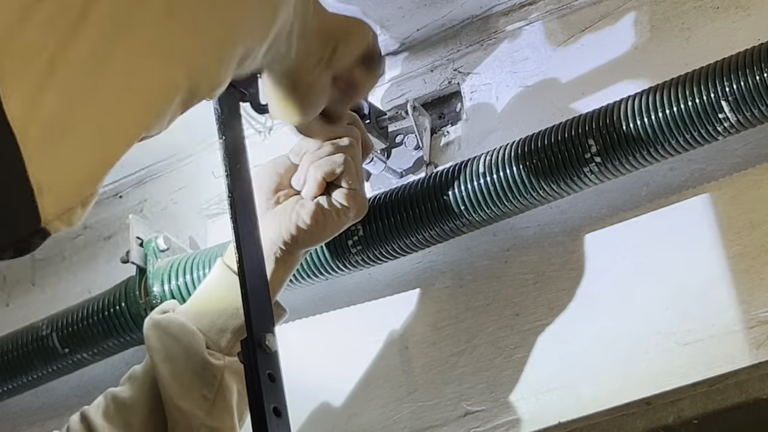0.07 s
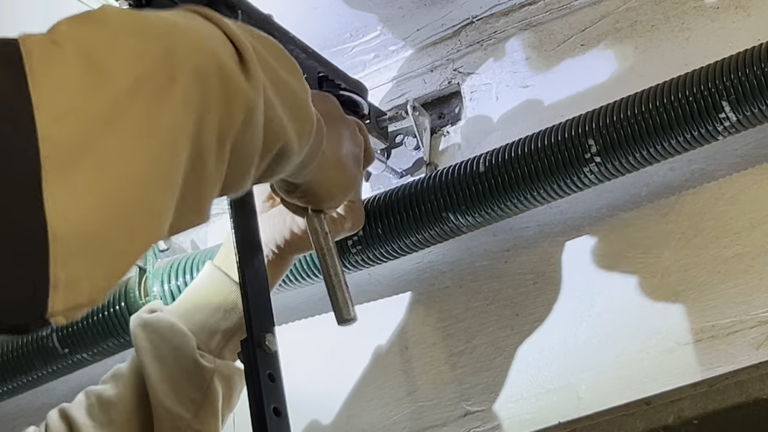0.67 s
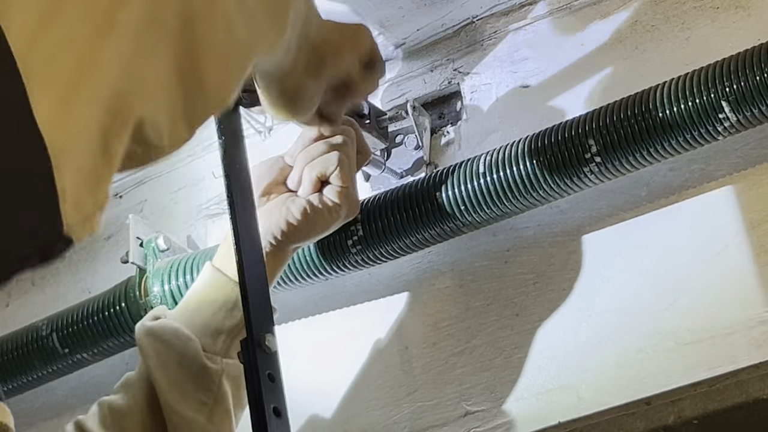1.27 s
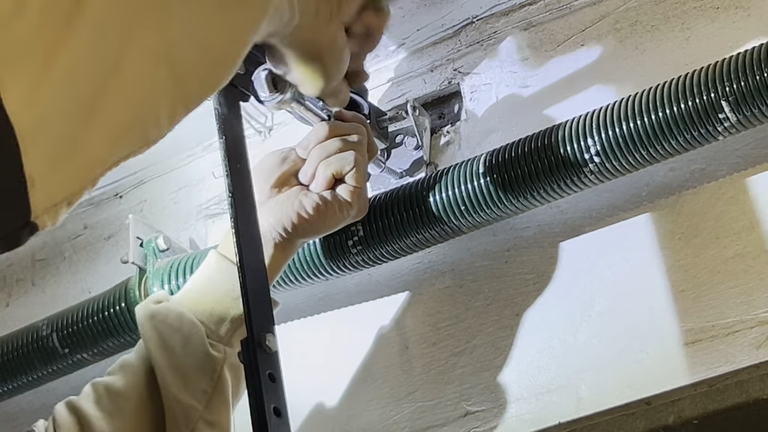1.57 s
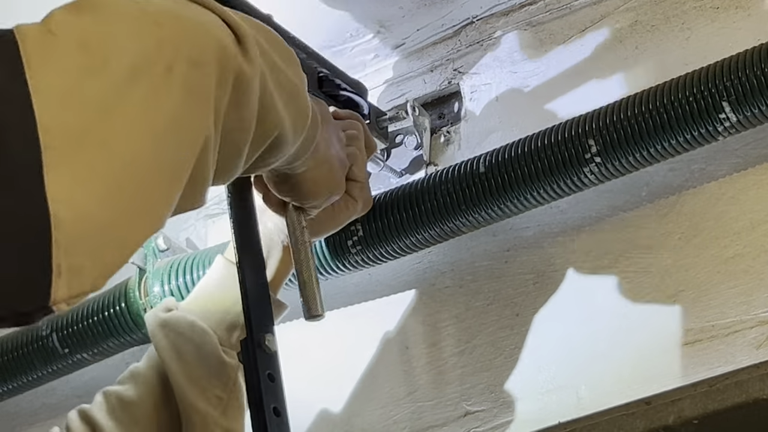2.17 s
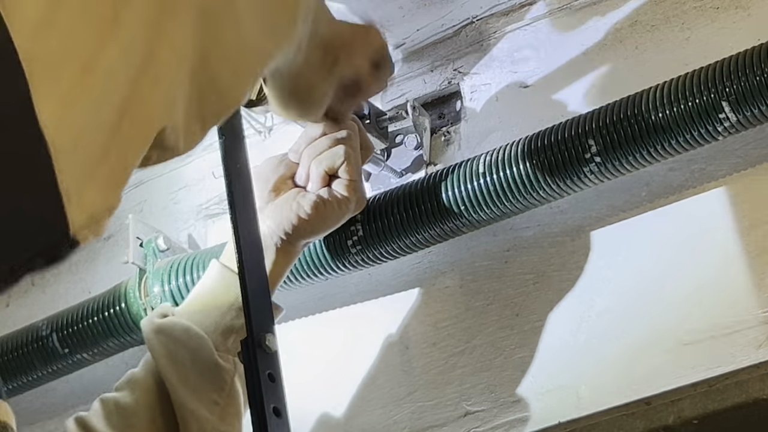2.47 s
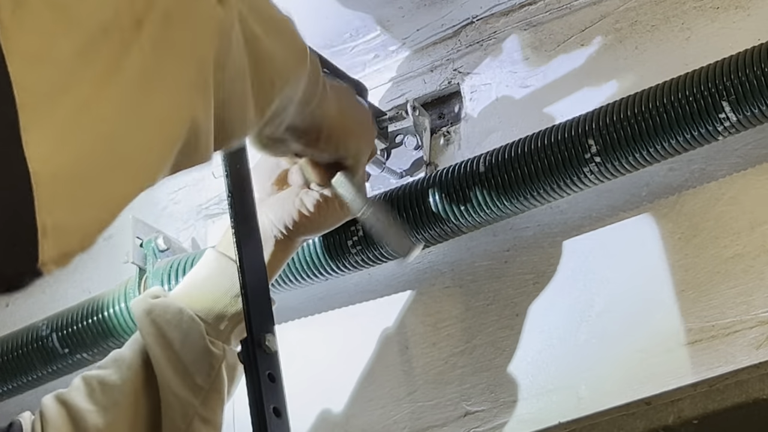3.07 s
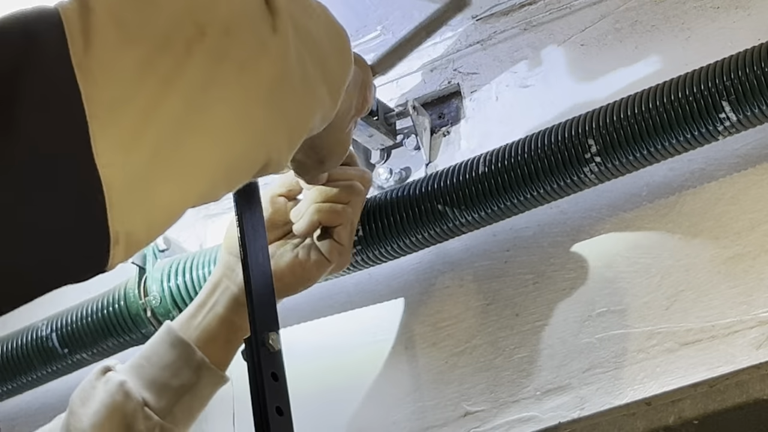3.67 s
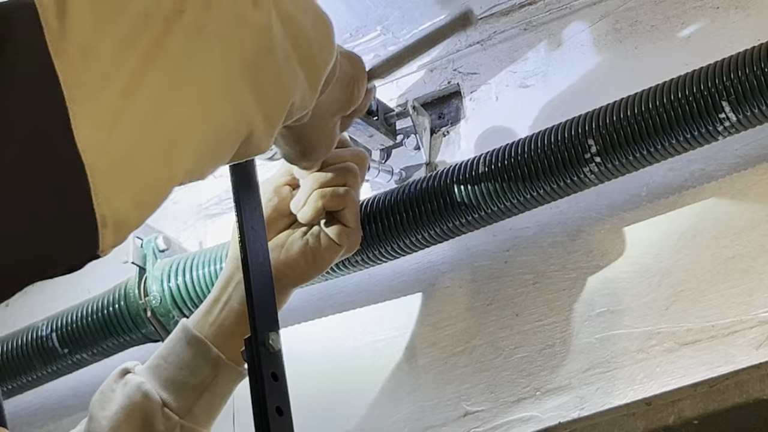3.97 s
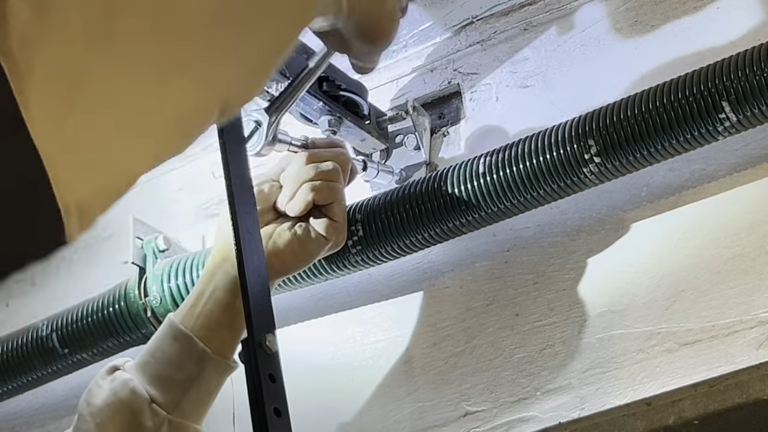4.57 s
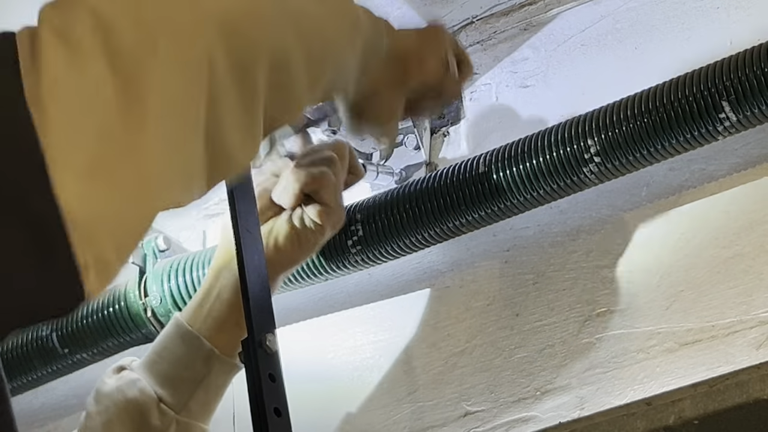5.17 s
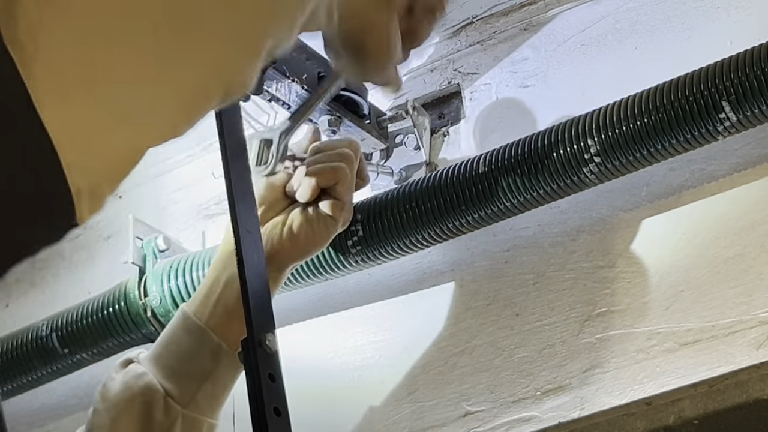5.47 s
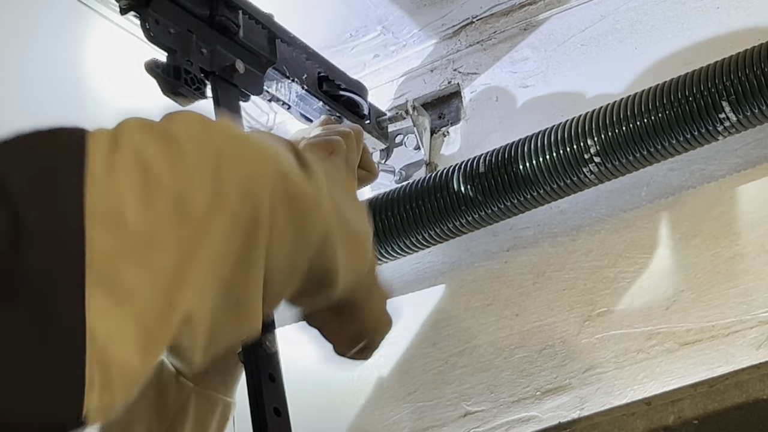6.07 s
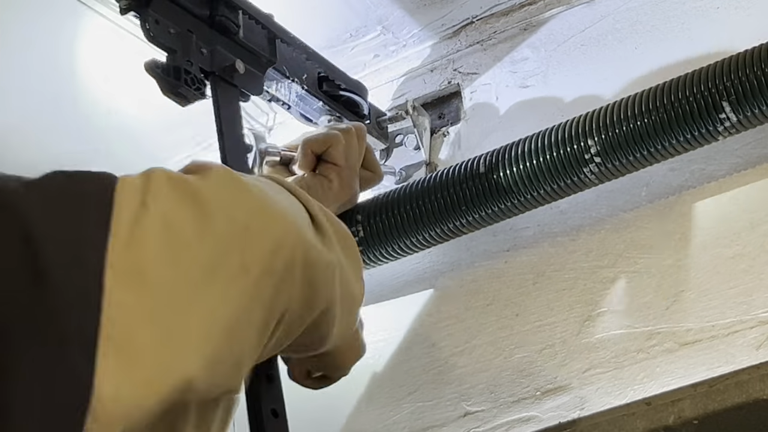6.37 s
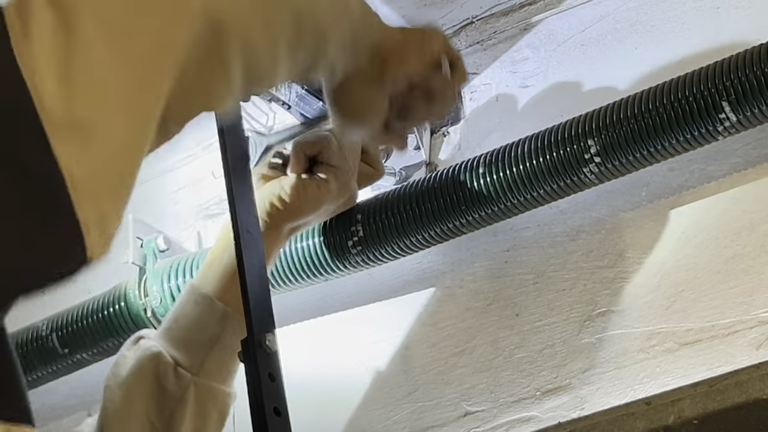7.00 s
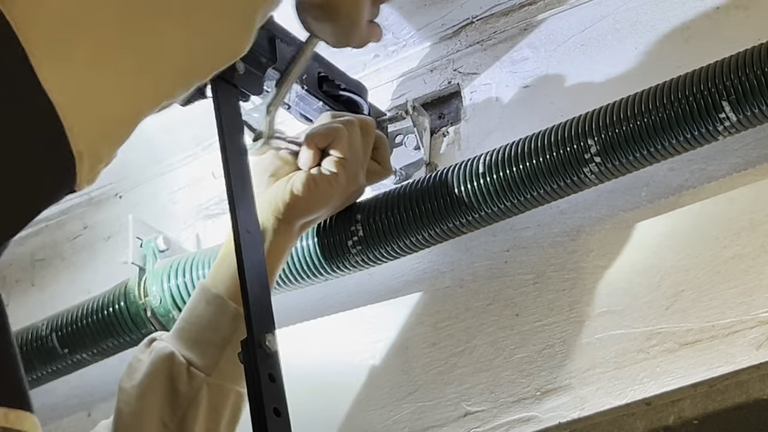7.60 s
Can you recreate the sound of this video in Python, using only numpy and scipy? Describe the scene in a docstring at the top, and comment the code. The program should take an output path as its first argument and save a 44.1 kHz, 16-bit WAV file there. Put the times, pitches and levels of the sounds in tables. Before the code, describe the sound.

A ratchet wrench works a steel bracket overhead in a bare garage. For three seconds, quick zips of ticks alternate with ringing clanks, about two and a half strokes a second. Small bright taps follow as the wrench is reseated. Then the loose socket clunks and the strokes resume with more rubbing, scraping and a stronger low drone from a shaken panel. It is heard in narrow stereo from below.

```python
"""A ratchet wrench on an overhead steel bracket in a bare garage, heard by a closely spaced microphone pair.
For three seconds it makes about 2.5 strokes a second: the pawl ticks over the teeth on each back swing,
and each pull closes the slack with a clank that rings the steelwork and the room. Small taps follow as
the wrench is reseated; the level dips briefly at 3.4 s. From 4 s the loose socket clunks on the bolt,
then the strokes resume with more rubbing and a stronger drone from the panel behind the bracket."""
import sys
import numpy as np
from scipy import signal
from scipy.fft import rfft, irfft, next_fast_len
from scipy.io import wavfile
from scipy.ndimage import uniform_filter1d

SR = 44100
rng = np.random.default_rng(int(sys.argv[2]) if len(sys.argv) > 2 else 0)


def wav_out(sig):
    """Save sig, one row per channel (or a flat mono array), as 16-bit PCM at SR to the path in sys.argv[1]."""
    wavfile.write(sys.argv[1], SR, np.round(np.clip(np.atleast_2d(sig).T, -1, 1) * 32767).astype(np.int16))


N = 345744
TAIL = 32768  # samples for one sound to die away
TIME, AGE = np.arange(N) / SR, np.arange(TAIL) / SR
SIDES = np.array([[1], [-1]])  # left and right channel


def undb(db):
    """Decibels to gain."""
    return 10 ** (np.asarray(db) / 20)


def unit(x):
    """Scale to rms 1."""
    return x / np.sqrt(np.mean(x ** 2))


def along(points, hz):
    """Read (Hz, value) points on a log-frequency axis."""
    freqs, values = np.transpose(points)
    return np.interp(np.log(np.maximum(hz, 1)), np.log(freqs), values)


def bins(x):
    """Frequencies of the spectrum of x."""
    return np.fft.rfftfreq(x.shape[-1], 1 / SR)


def colour(x, points, size=2048):
    """Causal filter with the gain of (Hz, dB) points, built from the cepstrum."""
    cepstrum = irfft(np.log(undb(along(points, np.fft.rfftfreq(size, 1 / SR)))))
    fold = np.r_[1, np.full(size // 2 - 1, 2), 1, np.zeros(size // 2 - 1)]
    response = irfft(np.exp(rfft(cepstrum * fold)))
    return signal.oaconvolve(x, response if x.ndim == 1 else response[None], axes=-1)[..., :x.shape[-1]]


def resonate(x, hz, width):
    """Two-pole band-pass, gain 1 at the centre."""
    return signal.lfilter(*signal.iirpeak(hz, hz / width, fs=SR), x)


def walk(rate):
    """Smooth random wandering with a spread near 1."""
    hold = int(SR / rate)
    return 1.3 * uniform_filter1d(np.repeat(rng.standard_normal(N // hold + 1), hold), hold)[:N]


def ripple(spread_db, step_hz):
    """The crowded peaks and valleys of a steel part's response, as (Hz, dB) points."""
    hz = np.linspace(100, 17000, 400)
    heights = np.interp(hz / step_hz, np.arange(400), rng.standard_normal(400))
    return np.c_[hz, spread_db * (heights - .06 * spread_db)]


def add(track, start, sound):
    """Mix a sound in at a start time in seconds."""
    i = int(start * SR)
    track[..., i:i + sound.shape[-1]] += sound[..., :max(N - i, 0)]


# Stereo width of the diffuse sound: (frequency [Hz], side minus mid [dB])
STEREO_WIDTH = [(60, -23.5), (130, -26), (250, -16.5), (500, -12.5), (1000, -8), (2200, -3), (3200, 0.5),
                (4500, -21.5), (8000, -38), (16000, -8)]

def diffuse(size):
    """Stereo noise: widest near 3 kHz, nearly mono in the bass and from 4.5 to 8 kHz."""
    mid, side = rng.standard_normal((2, size))
    return mid + colour(side, STEREO_WIDTH) * SIDES


# Decay of the bare garage, before stretching: (frequency [Hz], t60 [s])
GARAGE_DECAY = [(150, 1), (700, 0.69), (2000, 0.4), (5500, 0.3), (10000, 0.24), (15000, 0.23)]

def reverberation(stretch):
    """Wall reflections: diffuse noise whose half-octave bands die away at the room's pace."""
    spectrum = rfft(diffuse(TAIL))
    octaves = np.log2(np.clip(bins(AGE), 125, 16000) / 125)
    tail = 0
    for centre in np.arange(15) / 2:
        band = irfft(spectrum * np.maximum(1 - 2 * np.abs(octaves - centre), 0))
        t60 = stretch * along(GARAGE_DECAY, 125 * 2 ** centre)
        tail = tail + band * np.exp(-np.log(1000) * AGE / t60)
    return tail


# Room tone all around the microphones: (frequency [Hz], relative level [dB])
ROOM_TONE = [(20, -34), (40, 0.5), (60, -1.5), (110, -3.5), (200, -17.5), (320, -14), (450, -2.5),
             (1000, -28.5), (3000, -8), (8000, -44.5), (16000, -46)]

def garage_air(level_db=-57):
    """The still air of the garage: a steady low rumble with a faint hiss."""
    return undb(level_db) * unit(colour(diffuse(N), ROOM_TONE))


# Pulls that load the bracket overhead and drag the sleeve:
# (start [s], length [s], relative panel hum [dB], relative scrape [dB])
HANDLE_PULLS = [(0.22, .2, -53.5, -70), (0.92, 0.11, -49.5, -61), (1.284, 0.097, -43.5, -48),
                (1.677, 0.087, -44, -65), (2.083, 0.19, -47.5, -71), (2.465, 0.094, -49, -62),
                (2.931, .13, -41.5, -70), (3.2, 0.12, -45, -69), (4.058, .04, -39, -60),
                (4.28, 0.081, -38.5, -60), (4.67, 0.026, -32, -57), (4.78, 0.13, -47.5, -52),
                (5.169, 0.086, -31.5, -34.5), (5.364, 0.075, -44, -58), (5.57, 0.041, -43, -62),
                (6.247, 0.073, -31.5, -53), (6.6, 0.09, -32, -33.5), (6.716, 0.066, -39.5, -38.5),
                (6.963, 0.11, -43, -57), (7.192, 0.058, -40.5, -42), (7.376, 0.22, -34.5, -54),
                (7.68, 0.13, -31, -42.5)]

def effort(levels_db, rest_db, release_s, attack_s=.005):
    """Level in dB over time: each pull rises, holds and dies away above a resting level."""
    power = np.full(N, undb(rest_db) ** 2)
    for (start, length, *_), db in zip(HANDLE_PULLS, levels_db):
        envelope = (1 - np.exp(-AGE / attack_s)) * np.exp(-np.maximum(AGE - length, 0) / release_s)
        add(power, start, (undb(db) * envelope) ** 2)
    return 10 * np.log10(power)


def drone(modes):
    """Random shaking hums in a panel's modes, at rms 1."""
    shake = diffuse(N)
    hum = sum((-1) ** k * undb(db) * resonate(shake, hz, width) for k, (hz, width, db) in enumerate(modes))
    return unit(colour(hum, [(30, -22), (70, -2.5), (280, -2), (700, -20)]))


# The panel behind the bracket, main and loose low modes: (frequency [Hz], width [Hz], gain [dB])
PANEL_MODES = [(159.3, 8.2, -2.5), (173.4, 8.2, 0), (184.8, 10, -2), (205.5, 7.4, -2), (249, 61, -12.5)]
LOOSE_MODES = [(60.5, 14, -11.5), (81, 7.8, -9), (107.3, 14, -2.5), (136, 22, -5.5)]
# Its rumble between pulls: (time [s], relative level [dB])
RESTING_RUMBLE = [(0, -53), (1.5, -53.5), (2.7, -56.5), (3.6, -51), (4.6, -48.5), (5.7, -47.5),
                  (7.1, -48.5), (7.84, -52.5)]

def panel(hum_gain_db=7, rumble_gain_db=8.5, holding_db=-48.5, rumble_per_hum=.47):
    """Hands on the work shake the panel; each pull swells its hum and, less so, its rumble."""
    hum_db = effort([hum for _, _, hum, _ in HANDLE_PULLS], holding_db, release_s=.18)
    rumble_db = np.interp(TIME, *np.transpose(RESTING_RUMBLE)) + rumble_per_hum * (hum_db - holding_db)
    hum = drone(PANEL_MODES) * undb(hum_db + hum_gain_db)
    return hum + drone(LOOSE_MODES) * undb(rumble_db + rumble_gain_db)


# Swings of the handle overhead: (start [s], end [s], rubbing level [dB])
HANDLE_SWINGS = [(0.005, 0.15, -39), (0.406, 0.57, -37), (0.775, 0.88, -36), (1.111, 1.245, -36),
                 (1.48, 1.682, -38), (1.877, 2.015, -39.5), (2.277, 2.408, -37), (2.678, 2.888, -38.5),
                 (3.086, 3.165, -49.5), (3.505, 3.62, -49.5), (4.403, 4.501, -41), (4.49, 4.67, -32.5),
                 (5.006, 5.15, -29.5), (5.377, 5.593, -31.5), (5.746, 5.958, -32), (6.106, 6.243, -27.5),
                 (6.45, 6.646, -36.5), (6.85, 7.06, -33), (7.181, 7.4, -34), (7.509, 7.677, -33.5)]
# Dull rub and bright scrape as they reach the pair: (frequency [Hz], relative level [dB])
RUB_SPECTRUM = [(150, -16.5), (340, -13.5), (420, 2.5), (600, -1), (720, 2), (900, -3), (1120, -9.5),
                (1230, -2.5), (1700, -21), (2200, -18), (4000, -16), (16000, -51)]
SCRAPE_SPECTRUM = [(800, -7), (2000, -3), (2700, 2), (4000, 2), (7000, -8), (11000, -12), (16000, -29)]

def friction(scrape_gain_db=4.5, rattle_db=-8, contacts_per_s=120):
    """The ratchet head rubs and rattles through each swing; sleeve and hands scrape on the pulls."""
    swing = np.zeros(N)
    for start, end, db in HANDLE_SWINGS:
        release = np.exp(-np.maximum(start + AGE - end, 0) / .05)
        add(swing, start, undb(db) * (1 - np.exp(-AGE / .015)) * release)
    slips = undb(2.5 * walk(rate=130))
    body = ripple(spread_db=2.5, step_hz=110)
    rub = unit(colour(colour(diffuse(N) * slips, body), RUB_SPECTRUM))
    contacts = (rng.random(N) < contacts_per_s / SR) * undb(3 * rng.standard_normal(N))
    buzz = rng.standard_normal(512) * np.exp(-AGE[:512] / .0008)
    rattle = unit(colour(signal.oaconvolve(contacts, buzz)[:N], SCRAPE_SPECTRUM))
    rattle *= undb(rattle_db) * swing / swing.max()  # the socket only rattles on a brisk swing
    scrape_db = effort([scrape for *_, scrape in HANDLE_PULLS], rest_db=-62, release_s=.038)
    scrape = unit(colour(diffuse(N) * slips, SCRAPE_SPECTRUM)) * undb(scrape_db + scrape_gain_db)
    return swing * (rub + rattle) + scrape


# The pawl's run on each back swing: (start [s], length [s], tooth rate [1/s], relative peak level [dB],
# place of the peak [0-1], lowest mode offset [dB], ring offset [dB])
TOOTH_RUNS = [(0.018, 0.019, 51, -25, 0.54, 9, -3), (0.075, 0.059, 108, -21.5, 0.2, -12, 3.5),
              (0.4358, 0.1, 83, -23, 0.7, 3.5, -10), (0.7905, 0.093, 87, -21.5, 0.54, 0, -1),
              (1.185, .0616, 93, -27.5, 0.53, -5, 0), (1.5, 0.034, 25, -21.5, .8, -5, 4),
              (1.5514, 0.12, 80, -24.5, 0.3, -12, -1), (1.901, 0.1, 103, -22, 0.68, -3, 0),
              (2.2946, 0.096, 88, -22, .5, -5, -0.5), (2.745, 0.092, 80, -23.5, 0.52, -5, -3),
              (3.1236, .0227, 53, -19, 0.47, -9, 4.5), (4.534, 0.11, 68, -18.5, 0.3, 3, -2),
              (5.051, 0.066, 116, -14, 0.47, -12, -4.5), (5.437, 0.069, 98, -18.5, 0.29, -2, -10),
              (5.8056, .0674, 110, -12.5, 0.74, 2, -7.5), (6.1575, 0.03, 145, -6, .1, 0, -5),
              (6.4846, 0.082, 107, -17, 0.46, -0.5, -5), (6.889, 0.067, 129, -15, .4, -12, -10),
              (7.235, 0.077, 126, -18.5, 0.43, -2, -9), (7.573, .05, 135, -7, 0.1, -3, -6)]

def teeth(ease=.15, jitter=.07, fade_db=8, scatter_db=2, low_scatter_db=4):
    """Evenly cut teeth pass under the pawl: yields (time, level, lowest mode offset, ring offset)."""
    for start, length, rate, db, loudest, low_db, ring_db in TOOTH_RUNS:
        count = round(length * rate) + 1
        late, strong, seat = rng.standard_normal((24, 3))[:count].T
        turn = np.linspace(0, 1, count)
        eased = turn + ease * np.sin(2 * np.pi * turn) / (2 * np.pi)  # the handle is slower at both ends
        times = start + length * eased + jitter * late * np.sin(np.pi * turn) / rate
        levels = db - fade_db * np.abs(turn - loudest) + scatter_db * strong
        yield from zip(times, levels, low_db + low_scatter_db * seat, np.full(count, ring_db))


# Resonances of the pawl in the wrench head, lowest first: (frequency [Hz], width [Hz], gain [dB])
PAWL_MODES = [(7670, 320, -5.5), (8170, 180, -16.5), (13400, 140, -16.5), (14270, 390, -1.5),
              (15400, 1300, -6.5)]
# Its broad snap at the microphones: (frequency [Hz], gain [dB])
SNAP_SPECTRUM = [(300, -22.5), (1500, -15), (3000, -19.5), (4500, -15), (7000, -10), (9500, -13),
                 (13000, -12), (16000, -23)]

def pawl(tick_gain_db=3, snap_s=.0015, snap_db=1, room_db=-36, spring_db=-8):
    """The sprung pawl snaps into each tooth and rings briefly; the room joins the ticks into a zip."""
    ticks = np.zeros(N)
    age = AGE[:1024]
    for start, db, low_db, ring_db in teeth():
        contact = rng.standard_normal(len(age)) * np.exp(-age / snap_s)
        ring = 0
        for k, (hz, width, mode_db) in enumerate(PAWL_MODES):
            pitch = hz * (1 + .011 * rng.standard_normal())  # no two teeth seat the pawl alike
            gain = undb(mode_db + (low_db if k == 0 else 0))
            ring = ring + gain * np.exp(-np.pi * width * age) * np.sin(2 * np.pi * pitch * age)
        ring *= .9 * (1 - np.exp(-age / .0007))  # builds as the tip slides off the tooth's edge
        ring *= undb(ring_db + .7 * (db + 26))  # a hard drop rings, a light one only snaps
        tick = ring + undb(snap_db) * colour(contact, SNAP_SPECTRUM)
        peak = np.sqrt(2 * uniform_filter1d(tick ** 2, SR // 1000).max())
        add(ticks, start, tick / peak * undb(db + tick_gain_db))
    room = colour(reverberation(stretch=.99) * (1 - np.exp(-AGE / .00055)), [(9000, 3.1), (14000, 5.1)])
    spring = undb(spring_db) * resonate(room, hz=14300, width=500)  # sings on after each tick
    return ticks + undb(room_db) * signal.oaconvolve(ticks[None], room + spring, axes=-1)[:, :N]


# Small bright taps as the wrench is reseated: (time [s], relative level near 1.8 kHz [dB],
# offsets at 700 Hz [dB], 4 kHz [dB] and 10 kHz [dB], crack offset [dB], struck part's resonance [Hz])
RESEATING_TAPS = [(3.239, -33, 2.5, -2.5, 5, 3, 9540), (3.295, -42.5, 8, 0, -19, 7, 9800),
                  (3.436, -52.5, -19, -10, 5, 9, 6300), (3.565, -46.5, 7, -17, -9, 6.5, 2600),
                  (3.716, -32.5, -0.5, 5.5, 0, 8, 3980), (3.787, -37, 3, 5, -7.5, 4, 2080),
                  (3.893, -31.5, 5.5, -4.5, -5, 5.5, 3050), (3.962, -43.5, 11, 1.5, -6.5, 8, 2870)]
# The loose socket rocking on the bolt: (time [s], relative level near 700 Hz [dB],
# offsets at 4 kHz [dB] and 10 kHz [dB], crack offset [dB], struck part's resonance [Hz])
SOCKET_CLUNKS = [(4.062, -29.5, -2, -32, -5, 700), (4.079, -25.5, -1, -20, 11.5, 706),
                 (4.311, -36, -9.5, -25.5, 3.5, 3600), (4.393, -34, -16, -24, 5, 892),
                 (4.457, -28.5, -12, -25, 7, 880), (4.538, -28, -9, -13, 5, 900),
                 (4.644, -29, -21, -35, 5, 1013), (4.676, -17.5, -10, -17, 7.5, 1016),
                 (5.017, -31.5, -18.5, -31, -2, 869), (5.573, -23, -15, -26, 5, 784),
                 (5.785, -23, -8.5, -23, 5, 840), (5.93, -31, -9.5, -16.5, 7, 697),
                 (6.118, -21.5, -27, -40, -15, 696), (6.268, -22.5, -7, -46.5, 9, 1606),
                 (6.3, -27.5, -16, -24, 13.5, 1600), (6.459, -23.5, -4.5, -20, 6, 880),
                 (6.594, -24.5, -7, -9, 7, 699), (6.618, -21.5, -13, -25, 10.5, 686),
                 (6.851, -22, -14, -28.5, -2, 887), (7.001, -26, -16.5, -24, 0, 1253),
                 (7.039, -25, -15.5, -26, 12, 810), (7.2, -24.5, -20, -31, -8, 912),
                 (7.364, -19.5, -14, -18.5, 4.5, 820), (7.533, -23.5, -9, -19, -10, 900),
                 (7.678, -18, -10.5, -10, 4, 830)]
# Slack closing hard as a pull begins: (time [s], relative level near 1.8 kHz [dB],
# offsets at 700 Hz [dB] and 10 kHz [dB], crack offset [dB], struck part's resonance [Hz])
SLACK_CLANKS = [(0.2075, -12.5, -6.5, -6, -1, 1950), (0.582, -16, -6, -5, -3, 1840),
                (0.9278, -17, -4.5, -8, -2, 1860), (1.147, -27, -15, -5, -3, 1800),
                (1.269, -29, 1, 1, 1, 1770), (1.305, -21.5, -2, -10.5, -4, 1840),
                (1.683, -21.5, -1.5, -10, -1, 1830), (2.0684, -15.5, -3.5, -6.5, 0.5, 1774),
                (2.46, -17, -6.5, -6, 0, 1930), (2.8771, -17, -7, -9, -3, 1730),
                (2.948, -23, -1.5, -4.5, -3, 1720), (5.176, -18, 3.5, -7, 5, 1390),
                (6.245, -18, -3.5, -17.5, 1, 1590), (7.722, -24, 5.5, -17, 4.5, 1390)]

def blows(clank_mid_db=-4.5, body_db=7.5):
    """Every steel-on-steel blow in the taps' columns, then dB of (room tail, modes, struck part)."""
    for start, db, low, high, crack, hz in SLACK_CLANKS:
        yield start, db, low, clank_mid_db, high, crack, hz, (.27, .5, 7)
    for start, db, mid, high, crack, hz in SOCKET_CLUNKS:
        yield start, db - body_db, body_db, mid + body_db, high + body_db, crack, hz, (3, -3, 5.97)
    for tap in RESEATING_TAPS:
        yield *tap, (0, -2.5, 8.3)


# Modes of the bracket and wrench overhead: (frequency [Hz], gain [dB], t60 before the cap [s])
STEEL_MODES = [(699, -1.5, 0.84), (900, -3.5, 0.71), (978, -3, 0.32), (1060, -3, .5), (1124, -6.5, 0.77),
               (1227, -12, 0.44), (1290, -4.5, 0.3), (1370, -7, .4), (1597, -1.5, 0.24), (1610, -1, 0.49),
               (1778, 1, .42), (1840, -2, 0.52), (1914, -2.5, 0.62), (1885, -5, 0.46), (1980, -2, 0.45),
               (2332, -3, 0.22), (2590, -6.5, 0.18), (3330, -3.5, 0.81), (3810, -2, 0.33),
               (4100, -10, 0.31), (4080, 1.5, 0.31), (4255, -3.5, 0.34), (4620, -6, 0.37),
               (5350, -8.5, 0.098), (5795, -6, .22), (5850, -8, .2), (6520, -4.5, .22), (6830, 2, .18),
               (7400, -2.5, 0.2), (8300, -0.5, .2)]
# Dense ringing between those modes: (frequency [Hz], gain [dB])
DENSE_SPECTRUM = [(60, -23.5), (200, -3.5), (450, 4), (700, 2), (1100, 7.5), (1500, 3), (2000, 2.5),
                  (2550, -2.5), (3150, 3), (3900, 5), (5000, 5), (8000, 6.5), (11000, 7), (13000, -0.5),
                  (16000, -4.5)]
# Where the knocks sit between the microphones: (frequency [Hz], left minus right [dB])
PAIR_BALANCE = [(500, 1), (1100, 0.4), (2000, -1), (3500, -0.5), (8000, 0.1)]

def knocks(crack_s=.0072, crack_db=6.5, chatter_s=.026, chatter_db=-3, tail_db=2.5, modes_db=-10.5):
    """Each knock: a crack of steel on steel, the bracket's modes, a short chatter and the room's tail."""
    track = np.zeros((2, N))
    hz, mode_db, t60 = np.transpose(STEEL_MODES)
    t60 = np.minimum(t60, 1.15 * (hz / 100) ** -.37)  # the cap is shorter for higher modes
    steelwork = ripple(spread_db=2.2, step_hz=70)  # the same steel colours every knock
    rings = np.exp((2j * np.pi * hz[:, None] - np.log(1000) / t60[:, None]) * AGE)
    stereo_phase = undb(along(STEREO_WIDTH, hz)) * rng.choice([-1, 1], len(hz)) * SIDES
    tails = [reverberation(stretch=1.02) * (1 - np.exp(-AGE / .00091)) for _ in range(5)]
    for k, blow in enumerate(blows()):
        start, db, low_db, mid_db, high_db, sharp_db, part_hz, (wet_db, steel_db, part_db) = blow
        # the point of contact shifts, so each knock shares its energy differently among the modes
        share = undb(modes_db + steel_db + mode_db + 2 * rng.standard_normal(len(hz)))
        phase = 2 * np.pi * rng.random(len(hz)) + stereo_phase
        modes = ((share * np.exp(1j * phase)) @ rings).imag
        hardness = undb(.6 * max(sharp_db, 0))  # a squarer blow packs its crack into a shorter time
        crack = np.exp(-AGE * hardness / crack_s) * (1 - np.exp(-AGE / 63e-6))
        crack *= undb(crack_db + sharp_db) * np.sqrt(hardness)
        # loose parts rebound on each other for a few hundredths of a second
        rebounds = undb(3 * np.interp(AGE / .003, np.arange(256), rng.standard_normal(256)))
        chatter = undb(chatter_db) * np.exp(-AGE / chatter_s) * rebounds
        tail = undb(tail_db + wet_db) * tails[k % len(tails)]
        dense = colour(diffuse(TAIL) * np.hypot(crack, chatter) + tail, ripple(spread_db=2.2, step_hz=90))
        part_ring = (undb(part_db) - 1) * resonate(dense, part_hz, width=part_hz / 11)
        knock = colour(colour(dense + part_ring, steelwork), DENSE_SPECTRUM) + modes
        tone = [(750, low_db), (1400, 0), (2200, 0), (3800, mid_db), (9500, high_db)]
        add(track, start, undb(db) * colour(knock, tone))
    half_balance = np.array(PAIR_BALANCE) * [1, .5]
    return np.array([colour(track[0], half_balance), colour(track[1], half_balance * [1, -1])])


def microphone_pair(x, lead_s=6e-6):
    """Sound from the wrench reaches the left microphone just ahead of the right."""
    padded = np.pad(x, [(0, 0), (0, 2 * next_fast_len((N + TAIL) // 2) - N)])
    return irfft(rfft(padded) * np.exp(1j * np.pi * bins(padded) * lead_s * SIDES))[:, :N]


def scene():
    """From below the bracket: panel drone and garage air behind the rubbing, knocking, ticking wrench."""
    return panel() + garage_air() + friction() + microphone_pair(knocks() + pawl())


# A brief dip in level on both channels: (time [s], gain [dB])
LEVEL_DIP = [(3.385, -7.5), (3.403, -28), (3.415, -28), (3.435, -15)]

def record(dry, low_cut_hz=42, top_hz=15900):
    """The microphones shed the deep bass; the level dips and settles lower; the top is cut off."""
    thinned = signal.sosfilt(signal.butter(2, low_cut_hz, "high", fs=SR, output="sos"), dry)
    dipped = thinned * undb(np.interp(TIME, *np.transpose(LEVEL_DIP)))
    return signal.sosfilt(signal.ellip(8, .2, 70, top_hz, fs=SR, output="sos"), dipped)


dry = scene()
out = record(dry)
wav_out(out)
```